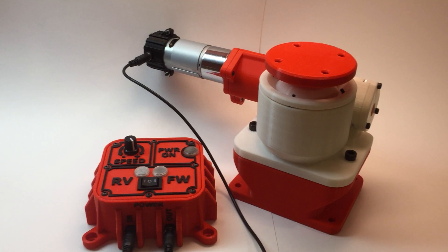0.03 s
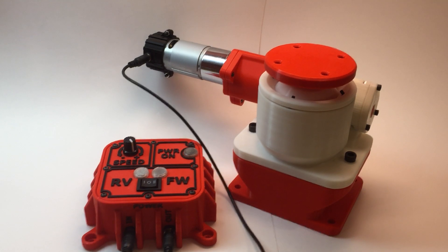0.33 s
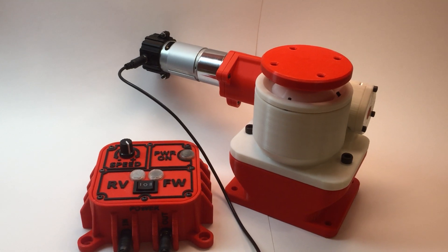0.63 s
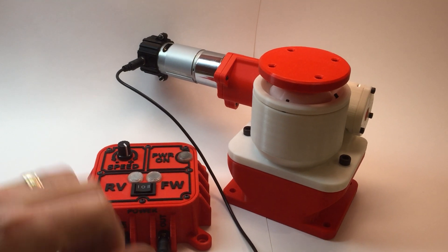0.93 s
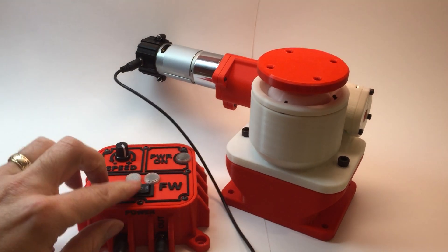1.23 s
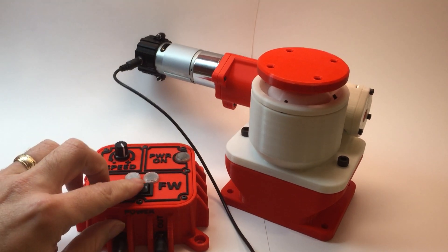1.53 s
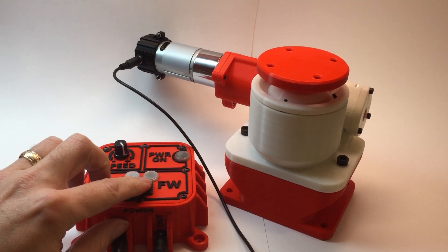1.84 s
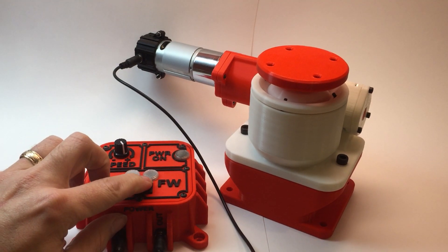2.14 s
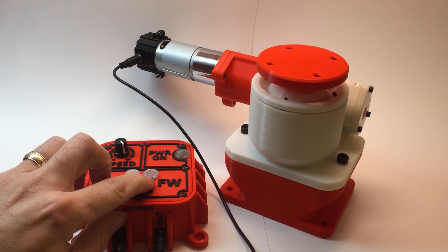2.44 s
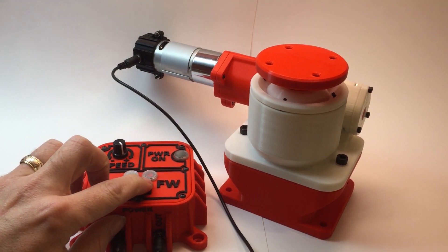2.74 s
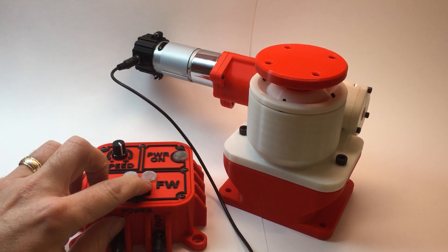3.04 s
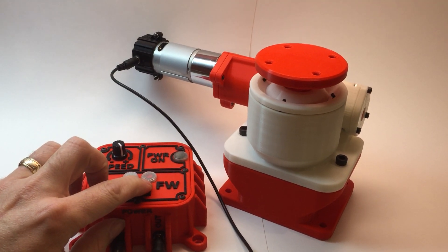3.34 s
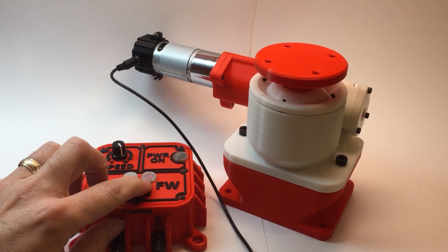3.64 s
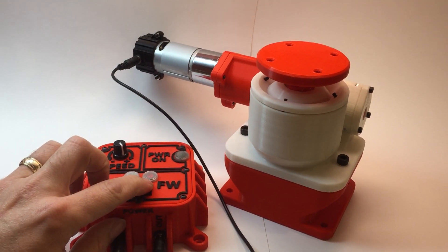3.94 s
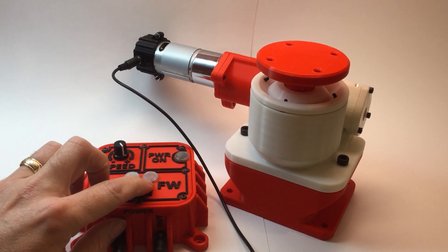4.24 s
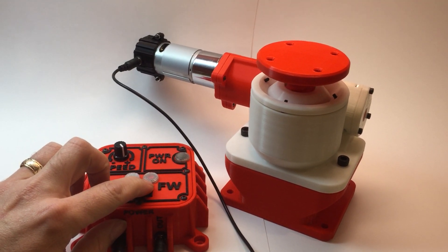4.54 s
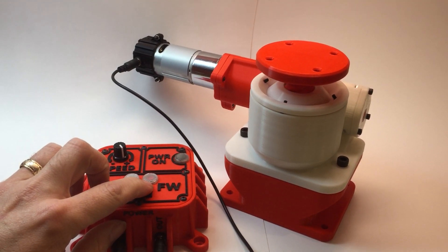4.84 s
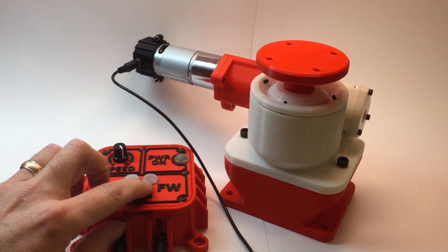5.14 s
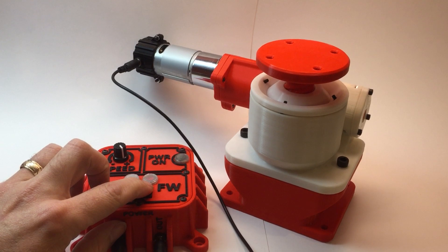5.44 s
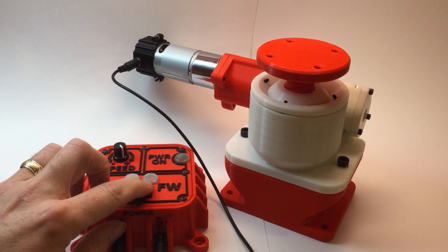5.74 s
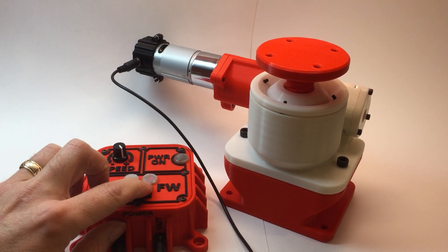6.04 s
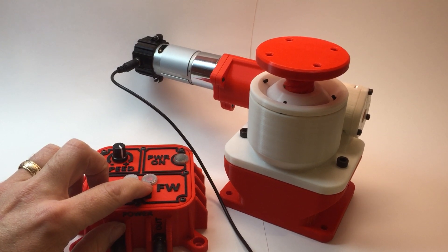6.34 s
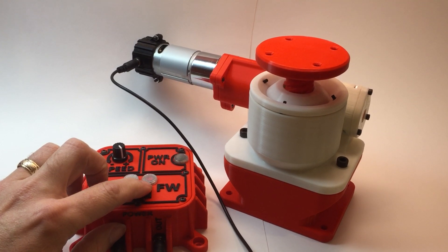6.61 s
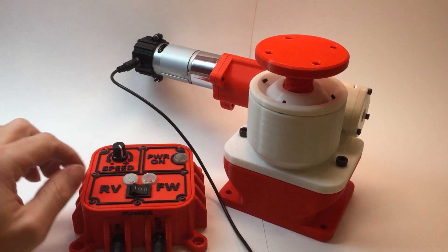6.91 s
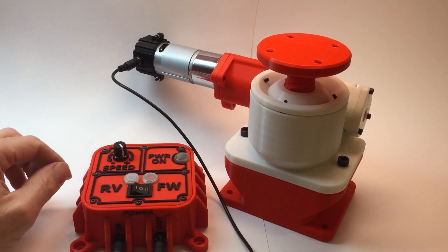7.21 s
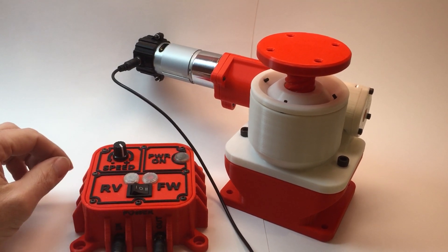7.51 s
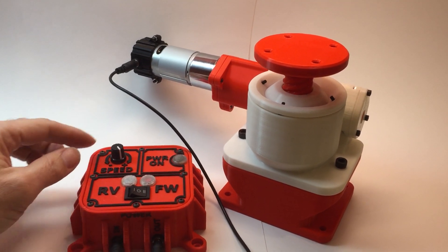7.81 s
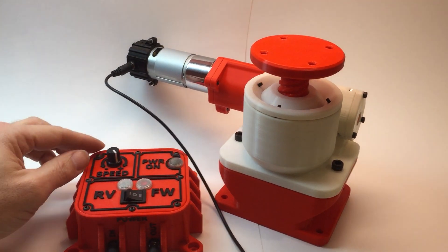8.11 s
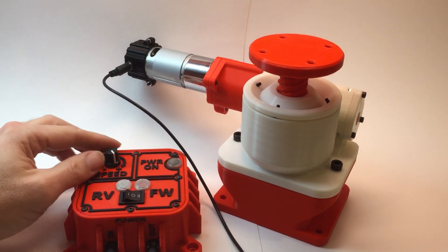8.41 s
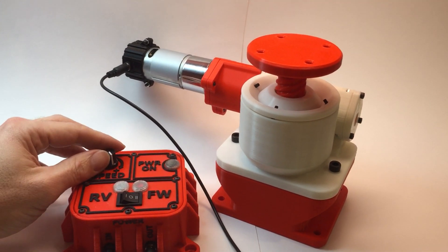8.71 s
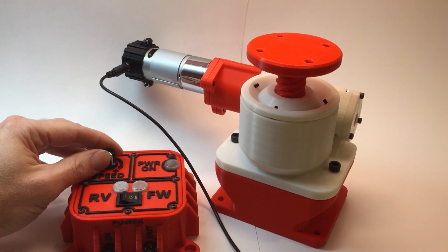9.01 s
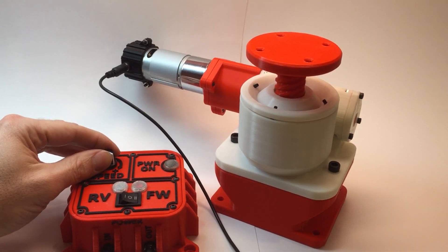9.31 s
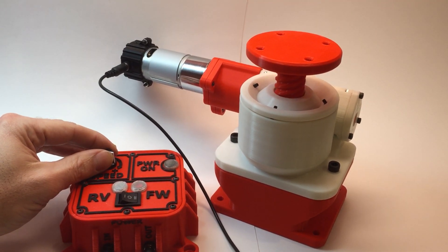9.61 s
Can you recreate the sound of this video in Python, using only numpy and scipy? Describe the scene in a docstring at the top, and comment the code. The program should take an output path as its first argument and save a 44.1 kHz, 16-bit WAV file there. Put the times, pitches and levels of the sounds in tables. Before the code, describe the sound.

For the first two seconds there is only a quiet indoor room, with a low rumble, a steady appliance hum and barely audible rubs of a hand on a table. At about 2 seconds a fingertip lightly ticks against a plastic rocker switch. At 2.5 seconds the switch snaps over with a sharp click, and a small electric gear motor starts almost instantly with a slight dull knock. From then until the end, near 10 seconds, it runs loudly at a steady speed: a mid-pitched hum, a high whine, a bright hiss, and gears rattling and grinding in a plastic housing with a metallic scraping edge. From about 2.8 seconds the whine and grinding swell roughly three times a second. The pitch dips very slightly just after 4 seconds, and the tone shifts gradually as the motor drives a screw jack. The microphone is close.

```python
"""A table in a quiet, humming room, where a small DC gear motor drives a screw jack in a printed plastic
housing. A hand brushes the table, a rocker switch clicks, and the five-pole armature spins up and hums.
Its twelve-tooth pinion whines, the brushes hiss, and the gear train rattles and grinds, swelling three
times a second as a slower wheel passes its tight spot. One close microphone."""
import sys
import numpy as np
from scipy import signal
from scipy.fft import rfft, irfft
from scipy.io import wavfile
from scipy.ndimage import uniform_filter1d, map_coordinates

SR = 44100
rng = np.random.default_rng(int(sys.argv[2]) if len(sys.argv) > 2 else 0)


def inscribe(sig):
    """Save sig as 16-bit PCM at rate SR to the path in sys.argv[1].

    A 1-D sig is mono; a 2-D sig holds one channel per row.
    Samples are clipped to [-1, 1] before scaling.
    """
    pcm = np.round(np.clip(np.atleast_2d(sig).T, -1, 1) * 32767)
    wavfile.write(sys.argv[1], SR, pcm.astype(np.int16))


N = 430416
T = np.arange(N) / SR
START_S, FREE_HZ = 2.492, 99.62  # power on; the shaft's turns per second when running free


def motor():
    """The shaft runs up within a few hundredths of a second and drives every part."""
    spin_up_s, torque_rise_s = .018, .027
    age = np.maximum(T - START_S, 0)
    spin = 1 - np.exp(-age / spin_up_s)
    torque = 1 - np.exp(-age / torque_rise_s)
    press = binding()
    strain = press / press.max()
    turns = np.cumsum(shaft_speed(strain) * spin) / SR
    grinding = gear_rattle(turns, strain) + scraping(turns, strain) + brushes(turns, strain)
    tones = armature(turns) + tooth_whine(turns, press)
    return torque * grinding + spin ** 3 * tones


def binding():
    """The slow wheel's teeth press into its tight spot and slip out faster, once a turn."""
    # How hard it binds. Each row: time in seconds, relative height of the swell in dB.
    tightness = [(2.85, -40), (3.47, -36), (3.8, -39), (5.37, -34.5), (6.33, -39.5), (6.96, -38.5),
                 (7.28, -46), (7.7, -36), (8.54, -40), (9.5, -35.5)]
    first_tight_s, turn_s, press_s, release_s = 2.848, .3169, .062, .046
    wheel = (T - first_tight_s) / turn_s
    ages = (((w + .5) % 1 - .5) * turn_s for w in (wheel, wheel + .5))
    tight, opposite = (np.exp(-(age / np.where(age < 0, press_s, release_s)) ** 2) for age in ages)
    swells = tight + .3 * opposite  # a weak second swell half a turn later
    return undb(curves(tightness)[0] - 2) * swells * (wheel > -.5)


def shaft_speed(strain):
    """Turns per second: sags just after each tight spot and as the screw catches leaving its seat."""
    sag_hz, lag_s, catch_hz = .75, .019, 1.503
    sag = sag_hz * np.interp(T - lag_s, T, strain) + catch_hz * bump(4.145, half_width_s=.02003)
    return (FREE_HZ - sag) * (1 + .001096 * walk(25))


def armature(turns):
    """Five poles tug at the magnets and hum; unbalance adds weak low tones."""
    # The pole hum. Each row: time in seconds, relative level in dB.
    hum = [(2.57, -40.5), (2.69, -36), (3.22, -37), (3.63, -33), (4.0, -33), (4.22, -38), (4.4, -36),
           (6.37, -37), (6.93, -39), (7.09, -37), (8.76, -38), (8.86, -37), (9.72, -37)]
    # Each row: multiple of the shaft rate, level in dB with the screw seated, halfway and raised.
    unbalance = [(1, -53.5, -58, -56), (2, -54, -59.5, -63), (4, -59, -70, -65), (6, -50, -64.5, -55.5),
                 (7, -55.5, -66, -81.5)]
    poles = undb(curves(hum)[0] + .26) * partial(turns, order=5, rough=.054)
    return poles + shaft_tones(turns, unbalance, rough=.26, rate=12)


def tooth_whine(turns, press):
    """The pinion's teeth load and release: twice the mesh rate sings, most where the wheel binds."""
    level = 1.07 * (undb(-52) + press)  # a faint whine stays between tight spots
    rasp = 1 + .2 * walk(260) + .18 * ripple(turns, order=1)
    return level * rasp * partial(turns, order=24, rough=.27, rate=70)


def gear_rattle(turns, strain):
    """Tooth errors repeat with each turn; loose teeth knock at random in the backlash."""
    # The rattle between tight spots. Each row: time in seconds, relative level in dB.
    rattling = [(2.58, -38), (2.68, -37), (3.91, -37.5), (4.48, -35.5), (6.19, -35.5), (7.2, -36),
                (9.48, -35.5), (9.7, -35)]
    # Each row: multiple of the shaft rate, dB within the rattle with the screw seated, halfway, raised.
    tooth_errors = [(9, -10.5, -14, -13), (10, -12.5, -14.5, -9), (11, -14, -10, -15.5),
                    (12, -13.5, -9.5, -15.5), (14, -14.5, -15, -18.5), (15, -28, -7, -12),
                    (16, -18, -18, -28), (17, -14, -9, -10.5), (19, -14, -13.5, -8), (20, -26, -14, -13),
                    (21, -24, -25, -18.5), (25, -15, -26, -31), (27, -27, -41, -30),
                    (29, -12.5, -17, -13.5), (35, -24, -32, -31), (37, -30, -21.5, -27),
                    (41, -21, -23.5, -19), (43, -38, -22, -20.5), (44, -27, -17, -33),
                    (49, -22, -24, -22.5)]
    # Each row: frequency in Hz, relative level in dB.
    knock_colour = [(60, -24), (180, -17), (330, -7), (430, -14), (530, -2.5), (640, -6.5), (760, -10.5),
                    (950, -5.5), (2000, -6), (2200, -8.5), (3000, -14), (4000, -30), (8000, -42)]
    # Resonances and a dip of the plastic housing. Each row: centre in Hz, width in Hz, gain in dB.
    housing = [(1100, 440, 6), (1280, 53, -8), (1490, 450, 3), (1910, 200, 7.5)]
    chatter_db = 2.5 * bump(2.61, half_width_s=.031)  # one flurry as the shaft reaches full speed
    level_db = curves(rattling)[0] - .5 + strain + chatter_db + .45 * walk(12)
    tones = shaft_tones(turns, tooth_errors, rough=.25, rate=10)
    force_db = ripple(turns, 5) + 2 * ripple(turns, 1) + 3.2 * ripple(turns, 6) + 1.3 * ripple(turns, 12)
    impacts = (rng.random(N) < .2) * rng.standard_normal(N)
    knocks = colour(impacts * undb(force_db + 1.04 * walk(25)), knock_colour, housing)
    return undb(level_db) * (tones + undb(-3) * unit(knocks))


def scraping(turns, strain):
    """Tooth flanks slide in spurts and ring the metal gear case, peaking just before the whine."""
    # The ring between tight spots. Each row: time in seconds, relative level in dB.
    ring = [(2.5, -44.5), (3.0, -41.5), (5.2, -41), (7.4, -42), (8.8, -43)]
    # Each row: frequency in Hz, relative level in dB.
    scrape_colour = [(500, -43), (1800, 3.5), (2600, 2.5), (3200, -1), (3850, -11.5), (4100, 1), (4450, 1),
                     (4650, -10), (5500, -3.5), (10400, -10), (11500, -5.5), (12500, -6.5), (15500, -7.5)]
    # Resonances of the metal. Each row: centre in Hz, width in Hz, gain in dB.
    gear_case = [(2810, 150, 4.5), (2966, 255, 9), (4090, 73, 5.5), (4168, 87, 9.5), (4280, 38, 8),
                 (4360, 87, 12.5), (4470, 32, 10.5), (5640, 95, 11), (11210, 330, 8.5), (11620, 370, 12.5)]
    strain_db, lead_s = 4.5, .015
    ring_db = curves(ring)[0] - .4 + strain_db * np.interp(T + lead_s, T, strain)
    force_db = 1.4 * ripple(turns, 12) + ripple(turns, 3) + .52 * ripple(turns, 1) + .72 * walk(60)
    spurts = friction(turns, repeat=.085) * undb(force_db)
    return undb(ring_db + 4) * unit(colour(spurts, scrape_colour, gear_case))


def brushes(turns, strain):
    """Brushes hiss on the commutator, harder at its five gaps and as each tooth shakes the shaft."""
    # The hiss grows as the motor runs. Each row: time in seconds, relative level in dB.
    hiss = [(2.58, -45.5), (4.22, -43), (9.7, -41)]
    # Each row: frequency in Hz, relative level in dB.
    brush_colour = [(500, -25), (1800, -8), (2500, 8), (3200, 0.5), (3850, -1), (4800, 0.5), (6500, 0),
                    (9600, 0), (10400, -3.5), (12000, -12), (13000, -6.5), (14000, -7), (15200, -4)]
    # Narrow treble peaks and notches that colour the brush hiss.
    # Each row: centre in Hz, width in Hz, gain in dB.
    treble_peaks = [(4910, 120, -7), (5240, 64, 3), (5400, 81, 6), (5770, 100, -16), (6610, 96, -7),
                    (6700, 70, 9.5), (6500, 60, 5.5), (6910, 93, 5), (7370, 86, 8.5), (8040, 47, 2),
                    (8380, 240, 6.5), (8820, 120, -6), (8900, 150, 11), (9420, 240, 5), (10050, 120, 6.5),
                    (12750, 150, 6)]
    hiss_db = curves(hiss)[0] - .3 + strain
    sliding = friction(turns, repeat=.55)
    force_db = ripple(turns, 5) + 1.4 * ripple(turns, 12) + .5 * ripple(turns, 3) + .61 * walk(45)
    return undb(hiss_db + 3.5) * unit(colour(sliding * undb(force_db), brush_colour, treble_peaks))


def shaft_tones(turns, table, rough, rate):
    """Shaft harmonics whose balance shifts as the screw rises and the housing radiates differently."""
    # The screw's climb. Each row: time in seconds, height (0 seated, 1 halfway, 2 raised).
    lift = [(3.8, 0), (4.5, 0.8), (6.3, 1.3), (7.1, 1.9)]
    height = curves(lift)[0]
    return sum(undb(np.interp(height, [0, 1, 2], db)) * partial(turns, round(order), rough, rate)
               for order, *db in table)


def friction(turns, repeat):
    """Sliding noise; a part of it comes from rough spots that return with each turn."""
    surface = rng.standard_normal(int(SR / FREE_HZ))
    spots = map_coordinates(surface, [turns % 1 * len(surface)], order=3, mode="grid-wrap")
    return rng.standard_normal(N) + repeat * spots


def take_up():
    """The first torque throws the gears across their backlash: one dull knock in the housing."""
    # Each row: frequency in Hz, level in dB, seconds to fade by 60 dB.
    housing_modes = [(327, -37, 0.11), (610, -30.5, 0.064)]
    return struck(housing_modes, age=np.maximum(T - 2.499, 0))


def switch():
    """A fingertip takes up the rocker's play, then snaps it over."""
    # Each row of both: start in seconds, crack peak in dB, seconds to fade by 60 dB,
    # brightness in dB per octave, thud gain in dB.
    touch = [(2.0135, -42.5, 0.036, -1, -51), (2.0265, -39.5, 0.046, -5.5, -46.5)]
    snap = [(2.4828, -23, .04, 2.2, -57), (2.4878, -14.5, 0.027, 0, -46)]
    # Resonances and a dip of the box. Each row: centre in Hz, width in Hz, gain in dB.
    switch_box = [(1550, 270, -6), (1900, 330, 12), (3260, 990, 14), (9000, 900, 13)]
    return (clicks(touch, switch_box, tail_db=-16, tail_t60=.23)
            + clicks(snap, (), tail_db=-17, tail_t60=.2))


def clicks(table, resonances, tail_db, tail_t60):
    """Short plastic cracks, each with a thud from the hollow switch box and a faint room tail."""
    # Each row: frequency in Hz, relative level in dB.
    rocker_colour = [(200, -10), (800, -9), (1400, -2), (4000, 0.5), (6500, -4), (10000, -10.5),
                     (15000, -14)]
    # Each row: frequency in Hz, relative level in dB, seconds to fade by 60 dB.
    box_modes = [(244, 1, 0.11), (395, -2.5, 0.11), (600, -12, 0.047)]
    out = np.zeros(N)
    age = np.arange(SR // 2) / SR
    thud = struck(box_modes, age)
    for start_s, db, t60, tilt_db, thud_db in table:
        fade = 1000 ** (-age / t60) + undb(tail_db) * 1000 ** (-age / tail_t60)
        crack = colour(rng.standard_normal(len(age)) * fade, rocker_colour, resonances, tilt_db)
        first = int(start_s * SR)
        out[first:first + len(age)] += undb(db) * crack / np.abs(crack).max() + undb(thud_db) * thud
    return out


def hand():
    """Faint dry rubs as the hand brushes the table and settles on the switch."""
    # Each row: peak time in seconds, half-width in seconds, level in dB, centre in Hz, width in Hz.
    rubs = [(.38, .05, -78, 7500, 7000), (1.05, 0.21, -74.5, 3480, 3500), (1.408, 0.021, -72, 2560, 1200),
            (1.758, 0.049, -69.5, 2560, 900), (2.38, .06, -76, 3000, 2500)]
    out = np.zeros(N)
    for peak_s, half_width_s, db, hz, width in rubs:
        band = signal.iirpeak(hz, hz / width, fs=SR)
        rub = signal.lfilter(*band, signal.lfilter(*band, rng.standard_normal(N)))
        out += undb(db + 1.5 * walk(68.7)) * bump(peak_s, half_width_s) * unit(rub)
    return out


def room():
    """Low rumble and an appliance's steady hum under a faint hiss; the bass comes up after a moment."""
    # Each row: frequency in Hz, relative level in dB.
    air_colour = [(15, -22), (25, -9.5), (59, -3), (98, -7), (146, -5), (202, -13.5), (271, -12),
                  (363, -14), (488, -29), (588, -24), (1090, -36), (1720, -35.5), (2560, -42),
                  (3010, -43.5), (15000, -53)]
    # Each row: hum frequency in Hz, level in dB.
    appliance = [(53.8, -54), (118.4, -64.5), (263.8, -65)]
    air = undb(-52.5 + walk(6)) * unit(colour(rng.standard_normal(N), air_colour))
    hum = sum(undb(db) * partial(hz * T, order=1, rough=.11, rate=16) for hz, db in appliance)
    rumble = signal.sosfiltfilt(signal.butter(2, 600, fs=SR, output="sos"), air)
    hiss = air - rumble
    return hiss + undb(np.interp(T, [.2, .28], [-8, 0])) * (rumble + hum)


def partial(turns, order, rough=0., rate=20):
    """A tone of order cycles a turn, wavering in level and phase."""
    size = np.sqrt(2) * (1 + rough * walk(rate))
    return size * np.sin(2 * np.pi * (order * turns + rng.random()) + rough * walk(rate))


def ripple(turns, order):
    """A force that rises and falls order times a turn."""
    return np.cos(2 * np.pi * (order * turns + rng.random()))


def struck(modes, age):
    """A body's modes ring down after one blow."""
    return sum(undb(db - 60 * age / t60) * np.sin(2 * np.pi * hz * age) for hz, db, t60 in modes)


def colour(x, points, resonances=(), tilt_db=0, size=8192):
    """An equaliser: a smooth curve with peaks and notches on it, tilted in dB per octave."""
    f = np.maximum(np.fft.rfftfreq(size, 1 / SR), 1)
    hz, db = np.transpose(points)
    shape = np.interp(np.log(f), np.log(hz), db) + tilt_db * np.log2(f / f.mean())
    for centre, width, height in resonances:
        shape += height / (1 + (2 * (f - centre) / width) ** 2)
    # Minimum phase, so nothing rings ahead of a hit.
    cepstrum = irfft(np.log(undb(shape)))
    cepstrum[1:size // 2] *= 2
    cepstrum[size // 2 + 1:] = 0
    response = irfft(np.exp(rfft(cepstrum)))[:size // 2]
    return signal.oaconvolve(x, response)[:len(x)]


def walk(rate):
    """Smooth random drift of rms 1 that changes about rate times a second."""
    step = max(int(SR / rate), 2)
    count = N // step + 3
    drift = np.interp(np.arange(N) / step + rng.random(), np.arange(count), rng.standard_normal(count))
    return unit(uniform_filter1d(drift, step // 2))


def bump(peak_s, half_width_s):
    """A smooth swell to 1 around a moment."""
    return np.exp(-((T - peak_s) / half_width_s) ** 2)


def curves(table):
    """Each column after the times as an envelope."""
    times, *columns = np.transpose(table)
    return [np.interp(T, times, column) for column in columns]


def undb(db):
    """Decibels to gain."""
    return 10 ** (np.asarray(db) / 20)


def unit(x):
    """Scale to rms 1."""
    return x / np.sqrt(np.mean(x ** 2))


def scene():
    """Motor, switch, hand and room, the same in both channels."""
    return np.tile(motor() + take_up() + switch() + hand() + room(), (2, 1))


def record(dry):
    """The microphone opens, drops the deepest bass and cuts the top."""
    open_s, low_cut_hz, top_hz = .083, 43, 15700
    low_cut = signal.butter(6, low_cut_hz, "high", fs=SR, output="sos")
    high_cut = signal.ellip(10, .2, 80, top_hz, fs=SR, output="sos")
    return signal.sosfilt(high_cut, signal.sosfilt(low_cut, dry * (T > open_s)))


dry = scene()
out = record(dry)
inscribe(out)
```